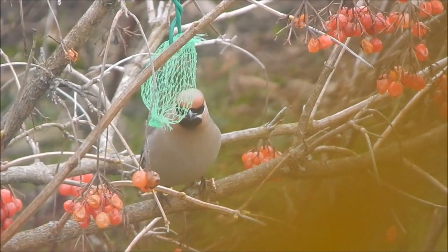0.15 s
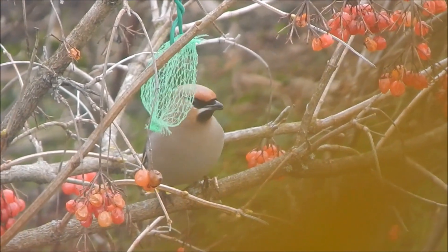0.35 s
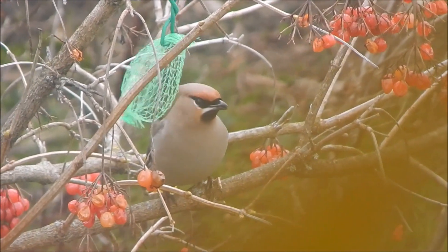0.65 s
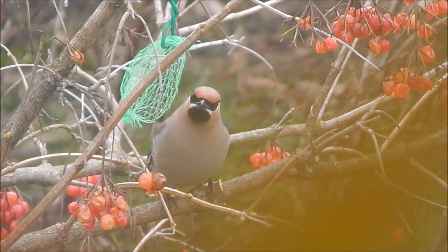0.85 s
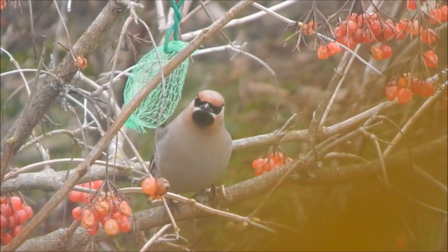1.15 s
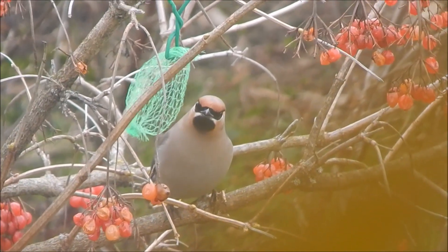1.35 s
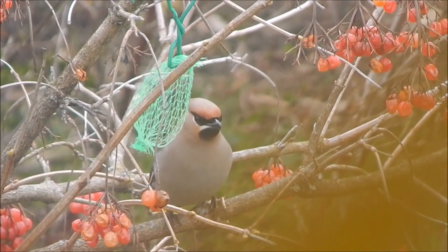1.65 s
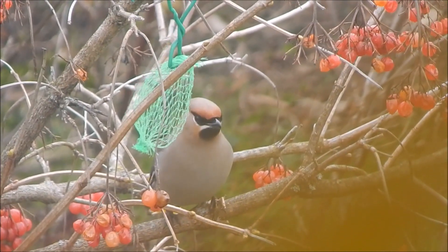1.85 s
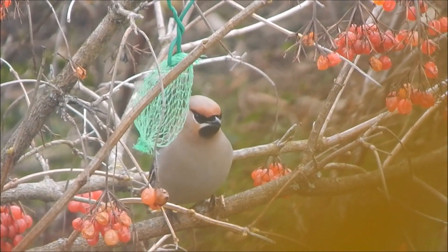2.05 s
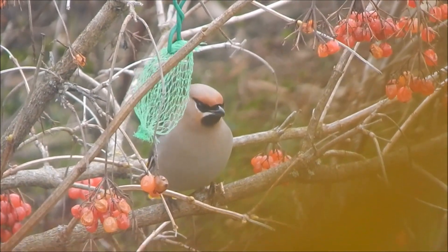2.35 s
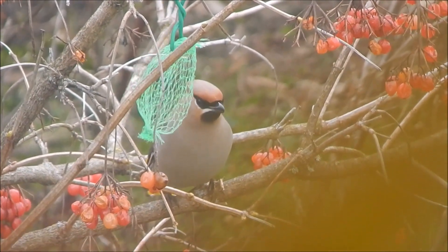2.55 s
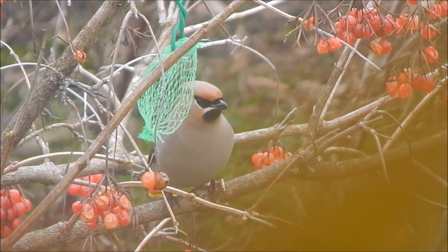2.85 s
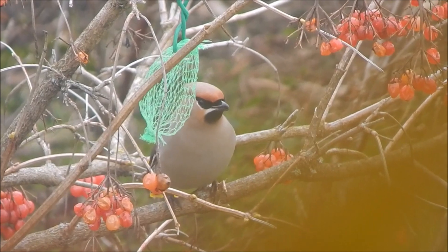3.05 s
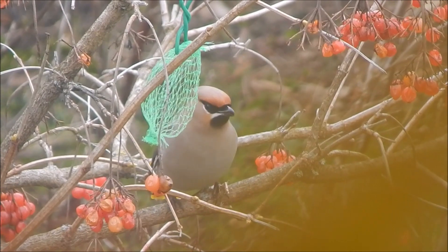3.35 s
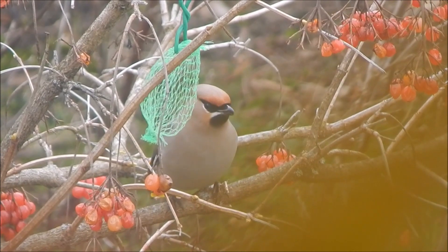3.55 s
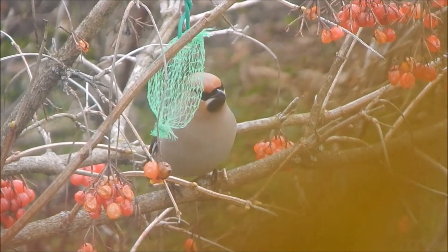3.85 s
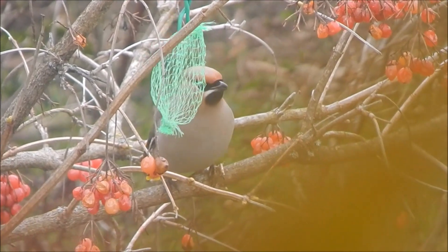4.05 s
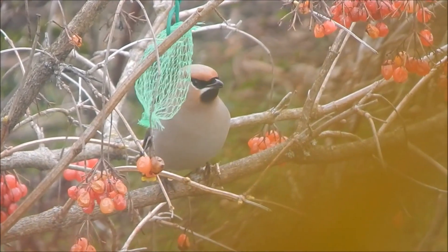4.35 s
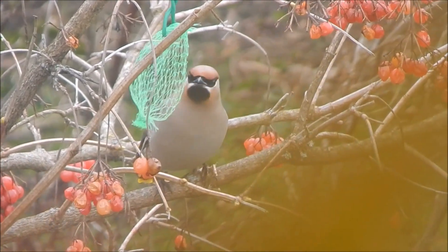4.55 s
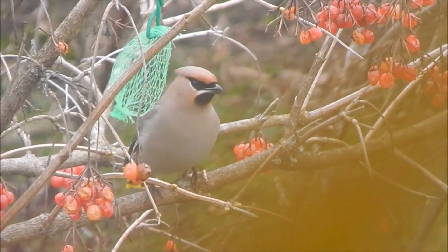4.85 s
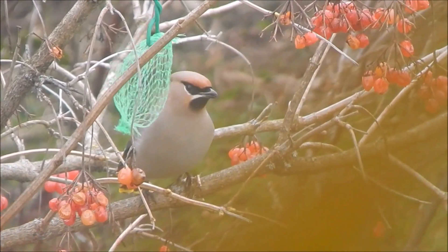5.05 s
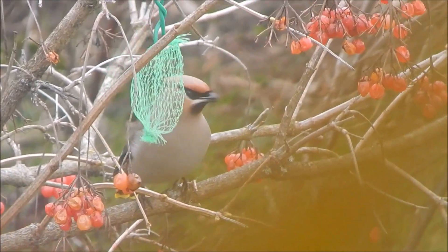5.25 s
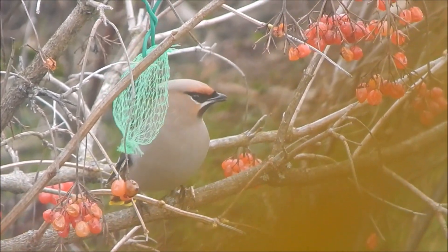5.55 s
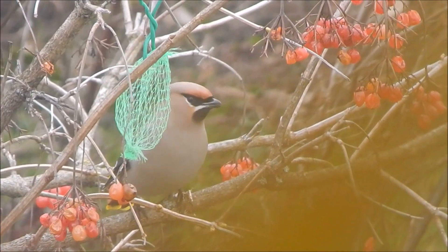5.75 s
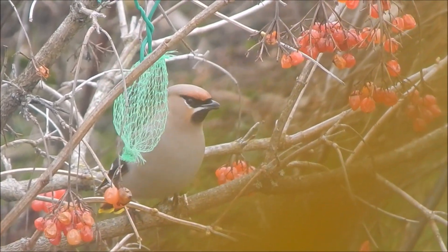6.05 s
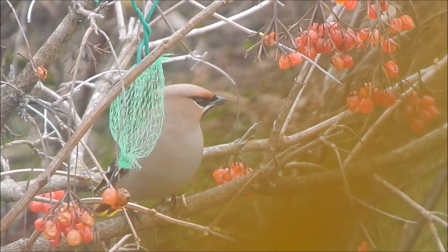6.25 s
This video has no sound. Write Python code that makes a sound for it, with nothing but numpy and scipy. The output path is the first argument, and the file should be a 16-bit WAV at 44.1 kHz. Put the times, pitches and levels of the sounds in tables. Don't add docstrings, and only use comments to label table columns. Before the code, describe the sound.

Over a low, steady hum of far traffic, faint thin whistles and twig ticks come first. Then a soft run of lower arched notes, rustling, and a small bird some metres away giving two falling slurs and a long, fast, even trill. Two short finch calls rasp upward into ringing whistles, faint distant birds answer, and the slurs and trill begin again. Outdoor garden microphone, short natural scatter from branches.

```python
import sys
import numpy as np
from scipy import signal
from scipy.fft import rfft, irfft
from scipy.io import wavfile
from scipy.ndimage import uniform_filter1d

SR = 44100
rng = np.random.default_rng(int(sys.argv[2]) if len(sys.argv) > 2 else 0)


def log_audio(samples):
    frames = np.atleast_2d(samples).T
    limited = np.clip(frames, -1, 1)
    pcm = np.round(limited * 32767).astype(np.int16)
    wavfile.write(sys.argv[1], SR, pcm)


def boost(x):
    u = np.asarray(x, float) / 20
    return 10 ** u


N = 282240

# frequency in Hz, level in dB per Hz.
TRAFFIC_COLOUR = [(28, -32.5), (50, -4), (120, -1), (290, -11.5), (500, -6.5), (734, -7), (1100, -13.5),
                  (1900, -33), (3500, -33), (5000, -29.5), (8000, -32.5), (11400, -33), (12000, -39),
                  (15800, -43)]
# time in seconds, tyre roar in dB, engine rumble in dB, breeze in leaves in dB.
ROAD_LEVELS = [(0.0, -64, -1, -0.5), (0.35, -65.5, -0.5, -1), (.6, -65.5, 0, -6), (0.8, -65, 7.5, 0.5),
               (1.15, -65.5, 0.5, 1), (1.4, -67, 1.5, -3), (1.75, -65.5, 1, -3), (2.1, -65.5, 1, 1),
               (2.8, -66, -0.5, -4), (3.4, -67.5, -5.5, 2), (4.4, -67.5, -3.5, 0.5), (5.5, -68, -3, -0.5),
               (6.4, -65, 5.5, 2)]
# delay in seconds, level in dB.
WALL_ECHOES = [(.005, -17), (.015, -15.5), (.022, -16.5), (.028, -17), (.036, -23.5)]

# start in seconds, hold in seconds, crisp level in dB, soft level in dB.
RUSTLES = [(0.073, 0.076, -92, -81), (0.44, 0.018, -86, -97), (0.642, 0.15, -91, -84.5),
           (0.756, 0.37, -79.5, -79.5), (1.134, 0.082, -71.5, -66), (1.252, 0.021, -76.5, -75.5),
           (1.328, 0.078, -84, -75.5), (1.4, 0.08, -77.5, -73), (1.51, 0.033, -67, -68),
           (1.596, 0.11, -79, -74.5), (1.685, 0.034, -71.5, -65.5), (1.76, 0.12, -75.5, -75),
           (1.923, 0.067, -70.5, -70), (2.279, 0.047, -75.5, -80), (2.39, 0.028, -83, -75.5),
           (2.484, .03, -80, -90), (2.05, 0.17, -83.5, -82.5), (2.823, .005, -76.5, -83),
           (3.005, .02, -79.5, -96), (3.274, 0.09, -84, -79.5), (4.142, 0.012, -77, -94),
           (4.297, 0.0085, -86, -85.5), (4.506, 0.013, -81.5, -88), (4.702, 0.014, -94, -81.5),
           (4.913, 0.013, -86, -84), (5.113, 0.014, -84.5, -82), (5.508, .01, -97, -83),
           (5.806, 0.506, -92, -85.5)]
# frequency in Hz, level in dB per Hz.
LEAF_COLOUR = [(2500, -30), (4200, -3.5), (7000, -8.5), (10000, -22.5), (15800, -31)]
# frequency in Hz, level in dB per Hz.
FEATHER_COLOUR = [(900, -9), (1500, -4.5), (2300, 1.5), (3700, -4), (5000, -2.5), (8000, -42)]
STIR_DB_PER_S, SETTLE_DB_PER_S = 600, 252

# time in seconds, crack level in dB, knock level in dB.
TICKS = [(3.5855, -58, -60), (0.7746, -63, -59), (0.8714, -67, -59.5), (0.8833, -65, -59),
         (0.9667, -66, -72), (1.0374, -64, -60), (1.2124, -56.5, -64), (1.386, -74, -61),
         (1.2415, -67, -68), (1.2505, -71, -70), (1.4315, -72, -66), (1.171, -67, -66), (1.196, -66, -62),
         (1.1552, -62, -67), (1.136, -75, -66), (1.219, -74, -66), (4.125, -73, -87), (4.4952, -67, -69),
         (4.518, -70, -75), (4.5561, -79, -71), (4.3294, -80, -72), (4.366, -76, -70), (1.9726, -62, -74),
         (1.503, -64, -72), (1.5105, -58, -65), (1.6884, -76, -67), (1.7278, -76, -56), (1.9275, -53, -58),
         (1.9455, -59, -54.5), (1.9687, -62, -76), (1.991, -54, -74), (2.0162, -73, -56), (2.288, -61, -74),
         (2.4758, -61.5, -71), (2.5148, -77, -65), (2.8197, -57.5, -85), (3.3748, -82, -54.5),
         (3.92, -71, -70), (3.9504, -57.5, -88), (4.0422, -64, -68), (4.151, -66, -72), (4.3, -65, -81),
         (4.5044, -66.5, -81), (5.243, -89, -63), (5.5244, -88.5, -64)]
FAINT_TICK_TIMES = [0.443, 0.62, 0.69, 1.1093, 1.161, 1.3, 1.18, 1.196, 1.304, 2.1, 4.313, 1.4, 1.1, 1.3,
                    1.3, 2.602, 2.916, 3.7683, 6, 4.9301, 6.4, 6]
FAINT_CRACK_DB, FAINT_KNOCK_DB = -70.5, -76.5
# start in seconds, length in seconds, pitch of the hollow in Hz, level in dB.
SCRAPES = [(1.14, 0.046, 1640, -63), (1.135, .045, 2300, -67), (1.154, 0.048, 3600, -57.5),
           (1.138, .05, 4330, -69), (1.201, .02, 2020, -68), (1.241, 0.029, 3780, -65.5),
           (1.308, .042, 3750, -68), (1.481, 0.034, 3950, -64), (1.54, .035, 3600, -62.5),
           (1.612, 0.032, 3450, -64), (1.773, .03, 3430, -65), (2.284, 0.03, 2600, -71),
           (2.48, 0.031, 3250, -70.5), (2.142, 0.076, 4200, -70.5), (4.321, 0.013, 4000, -70),
           (4.361, 0.013, 3700, -71.5)]
SLIPS_PER_S, HOLLOW_WIDTH, SLIP_SCATTER_DB = 1100, .26, 2.5

# start in seconds, length in seconds, lowest pitch in Hz, level in dB.
FAR_CALLS = [(3.238, 0.12, 5030, -61), (3.421, 0.13, 4860, -64.5), (3.618, 0.1, 5050, -60),
             (4.143, 0.14, 5057, -63.5), (4.357, 0.091, 5070, -65.5), (4.573, 0.09, 4920, -65.5),
             (4.559, 0.055, 3840, -69), (4.698, 0.036, 3760, -66.5), (4.78, 0.26, 4130, -82.5),
             (4.998, 0.052, 2156, -75.5), (0.6, 0.078, 6400, -69), (0.79, 0.1, 6160, -72),
             (2.273, 0.13, 6300, -73.5), (2.699, 0.22, 6490, -74.5), (4.848, 0.13, 6030, -79.5)]
# share of length, share of pitch range, level in dB, share of lead-in.
FAR_SHAPE = [(0, 0.93, -3.5, 0.7), (.2, 0.93, -2, 0.64), (.5, .55, -5, 0.19), (.85, 0.059, -6.5, 0.1),
             (1, 0.12, -16, 0)]
FAR_FALL, FAR_LEAD_DB = 1.12, -2
# start in seconds, length in seconds, pitch in Hz, level in dB.
MURMURS = [(0.067, 0.059, 2470, -79), (.12, 0.27, 2864, -78.5), (.3, .24, 2620, -85),
           (2.521, 0.14, 2470, -79), (2.542, .1, 2690, -80), (2.723, .17, 2690, -76.5),
           (2.757, .07, 2460, -76), (2.88, 0.071, 2550, -84), (3.442, .09, 2360, -76.5),
           (4.66, 0.14, 2226, -80), (5.2, 0.088, 2420, -81), (5.4, .2, 2260, -82), (5.585, .02, 5330, -78)]

# start in seconds, length in seconds, first Hz, last Hz, level in dB.
WHISTLES = [(0.567, .022, 7240, 7170, -70.5), (.586, .024, 7360, 6200, -70), (.725, 0.027, 7150, 7200, -75),
            (0.744, 0.022, 7100, 6400, -67), (0.884, 0.023, 7130, 6300, -66),
            (2.556, 0.085, 4100, 3980, -75), (5.966, .014, 4170, 4550, -65.5),
            (3.297, 0.052, 4350, 4200, -68), (2.874, 0.015, 7030, 6250, -70), (3, 0.042, 7400, 6360, -73),
            (3.03, 0.15, 7760, 7540, -74.5), (3.384, 0.13, 4450, 4080, -71), (3.881, 0.22, 7470, 7640, -77),
            (4.114, 0.024, 7220, 6240, -72), (.55, 0.455, 518.5, 551.3, -67.5),
            (5.455, 0.049, 3240, 3155, -76)]
SCOOP, SCOOP_SHARE, SCOOP_DB = 0.025, 0.13, -3
FADE_SHARE, FADE_DB = 0.05, -19
# time in seconds, pitch in Hz, level in dB.
GLIDE = [(5.2, 4420, -80), (5.215, 4550, -74.5), (5.27, 4480, -72), (5.31, 4270, -71), (5.352, 4140, -74),
         (5.37, 4080, -73), (5.425, 3960, -73), (5.44, 3550, -84), (5.456, 3250, -85)]
# start in seconds, length in seconds, top pitch in Hz, last pitch in Hz, level in dB.
BOWS = [
    (0.761, 0.21, 3685, 3530, -69.5),
    (0.964, 0.14, 7130, 6880, -64.5),
    (2.213, 0.137, 3170, 3100, -75),
    (2.371, 0.19, 4010, 3820, -65),
]
# share of length, share of pitch, level in dB.
BOW_SHAPE = [(0, .94, -12), (.1, .972, -3), (.28, 1, 3), (.55, 1, 2), (.85, 1, -4), (1, 1, -11)]

# start in seconds, highest pitch in Hz, level in dB.
ARCHES = [(1.304, 2940, -67), (1.394, 2910, -63), (1.484, 2870, -63), (1.571, 2810, -63),
          (1.667, 2860, -63), (1.765, 2890, -58.5), (6.161, 2900, -66.5)]
# share of length, share of pitch range, level in dB, share of lead-in.
ARCH_SHAPE = [(0, 0, -4, 0), (.2, .4, -2, 0), (.38, .82, -1, 0), (.58, 1, 0, 0), (.75, .88, 0, 0),
              (.9, .58, -1, 0), (1.02, .45, -6, 0)]
# start in seconds, highest pitch in Hz, level in dB.
LATE_ARCHES = [(5.803, 2990, -69), (5.885, 3020, -64.5), (5.972, 3040, -64), (6.060, 2970, -62.5),
               (1.858, 2950, -59.5), (6.261, 2930, -70)]
# share of length, share of pitch range, level in dB, share of lead-in.
LATE_ARCH_SHAPE = [(0, 0.12, -3, 0), (.2, 0.557, -7.5, 0), (.38, 0.82, -4, 0), (.6, 0.94, 1, 0),
                   (.9, .95, -6, 0), (1.05, .8, -10, 0), (1.2, 0.44, -14, 0)]
ARCH_S, ARCH_LOW_HZ = 0.0552, 2140

# time in seconds, strongest band in Hz, level in dB, upper bands in dB.
CHIRP = [(.044, 3680, -79, 4), (.062, 4040, -65.5, -1), (.088, 4210, -62.5, -10), (.117, 4370, -64, -6),
         (.132, 4120, -69, -2), (.15, 4060, -75, -3)]
CHIRP_STEP_HZ = 370

# time in seconds, pitch in Hz, level in dB.
FINCH_CALLS = [
    [(3.537, 2230, -63), (3.563, 2525, -58), (3.575, 3010, -51), (3.587, 3740, -38.5), (3.596, 4200, -34.5),
     (3.606, 4310, -37), (3.632, 4228, -36.5), (3.652, 4340, -43), (3.66, 4290, -104)],
    [(3.791, 2396, -62), (3.822, 2422, -60), (3.835, 2875, -54), (3.847, 3580, -41), (3.857, 4200, -36),
     (3.864, 4247, -34.5), (3.888, 4237, -32), (3.897, 4220, -35.5), (3.905, 4370, -68.5)],
]
# multiple of pitch, level in dB.
RASP = [(1.5, -8), (2, 0), (2.5, -1), (3, -11), (3.5, -11), (4, -27)]
# pitch in Hz, level in dB.
RASP_FADE = [(2200, 2.5), (2500, 10.5), (2950, -1.5), (3600, -36), (4200, -74.5)]
RASP_LAG_S, RASP_LAG_DB = .009, -24
# multiple of pitch, level in dB.
RING = [(2, -36), (3, -34)]
RING_DB, RING_FADE_DB_PER_S = (-5, -8), 90

# start in seconds, highest pitch in Hz, lowest pitch in Hz, level in dB, lead-in in dB.
SLURS = [
    (1.516, 6890, 5630, -40, -9),
    (1.629, 6790, 5550, -38, -8),
    (5.753, 6960, 5660, -41, -18.5),
    (5.866, 6810, 5600, -40.5, -6.5),
]
# share of length, share of pitch range, level in dB, share of lead-in.
SLUR_SHAPE = [(0.031, -0.91, -10, 1), (.155, 0.296, -3, 1), (.24, 0.914, 1.5, 0.42), (.31, 1, -2, 0.37),
              (0.421, .86, 0, 0.15), (0.701, 0.25, -1, 0), (.9, 0.02, 0, 0), (.95, -0.04, -17, 0),
              (1, -1.2, -15, 0)]
# share of length, share of pitch range, level in dB, share of lead-in.
FLICK_SHAPE = [(-.05, -1.3, -24, 0), (.03, -0.21, -25, 0), (.1, .6, -19, 0), (.16, 1.0, -21, 0),
               (.24, 1.15, -24, 0)]
SLUR_S = 0.06

# start in seconds, lowest pitch in Hz, level in dB, lead-in in dB.
TRILL = [(1.735, 4360, -35, -11), (1.834, 4446, -34, -10), (1.928, 4430, -34, -15), (2.034, 4405, -36, -1),
         (2.134, 4430, -36.5, -5), (2.241, 4390, -36.5, -9), (2.35, 4380, -37.5, 2),
         (2.455, 4346, -36.5, -4.5), (2.566, 4380, -38, -5), (2.678, 4260, -37, -10),
         (2.792, 4287, -35.5, -6.5), (2.911, 4274, -37, -9), (3.023, 4242, -37, -4), (5.973, 4350, -39, -9),
         (6.07, 4380, -36.5, -5.5), (6.168, 4340, -40, -11), (6.264, 4330, -37.5, -6),
         (6.371, 4450, -33.5, -9)]
# share of length, share of pitch range, level in dB, share of lead-in.
TRILL_SHAPE = [(0, .65, -22, 1), (.1, .42, -4, 1), (.23, 0, -3, .6), (.32, .07, -12, .25),
               (.42, .27, -2, 0), (.6, .67, -1, 0), (.77, .93, -1, 0), (.91, 1, -3, 0), (1, .9, -24, 0)]
# share of length where it catches, swell to the end in dB, lift of the top in Hz.
VOICING = [(0.4, 4, 30), (.32, 3.5, 4), (0.22, 6.5, 10), (.3, 3, 12), (0.346, 4, 0.1), (0.24, 1.5, 0.1),
           (0.26, 3.5, 0.1), (0.29, 3, 0.1), (0.29, 0, 0.1), (.43, -6, 25), (0.51, -4.5, 25.4),
           (0.42, -5, 33), (.46, -2, 0.1), (0.45, -4, 64), (0.49, 0, 30), (0.49, -5, 27), (0.6, -1, 20),
           (0.71, -4, -120)]
TRILL_STARTS_S = 1.73, 5.96
TRILL_NOTE_S, TRILL_TOP_HZ = 0.0676, 4716
TIRING_S_PER_S, SAG_HZ_PER_S = 0.0044, 56


def colour(x, points):
    hz, db = np.transpose(points)
    f = np.maximum(np.fft.rfftfreq(len(x), 1 / SR), 1)
    gain_db = np.interp(np.log(f), np.log(hz), db, left=-90, right=-90)
    return irfft(rfft(x) * boost(gain_db), len(x))


def unit(x):
    return x / np.sqrt(np.mean(x ** 2))


def walk(rate, count=N):
    k = int(SR / rate)
    held = np.repeat(rng.standard_normal(count // k + 1), k)
    return 1.73 * uniform_filter1d(uniform_filter1d(held, k), k)[:count]


def band(hz, kind, order=2):
    return signal.butter(order, hz, kind, fs=SR, output="sos")


def curves(rows):
    s, *columns = np.transpose(rows)
    i = np.arange(int(s[0] * SR), min(int(s[-1] * SR), N))
    return i, [uniform_filter1d(np.interp(i / SR, s, c), size=120, mode="nearest") for c in columns]


def add(out, i, hz, db, partials, wobble=0.0043, flicker_db=3.0, haste=150):
    unsteady_hz = hz * (1 + wobble * walk(haste, count=len(i)))
    phase = 2 * np.pi * np.cumsum(unsteady_hz) / SR
    fade = signal.windows.tukey(len(i), min(1, 300 / len(i)))
    gain = np.sqrt(2) * boost(db + flicker_db * walk(0.586 * haste, count=len(i))) * fade
    for multiple, partial_db in partials:
        audible = multiple * hz < .4 * SR
        out[i] += gain * boost(partial_db) * audible * np.sin(multiple * phase)


def phrase(notes, shape, **unsteady):
    out = np.zeros(N)
    at, rise, shape_db, lead = np.transpose(shape)
    for s, length, low, top, db, lead_db in notes:
        note = [s + length * at, low + (top - low) * rise, db + shape_db + lead_db * lead]
        i, (hz, note_db) = curves(np.transpose(note))
        add(out, i, hz, note_db, [(1, -1.5), (2, -48.5)], **unsteady)
    return out


def garden(t60, direct_db, wet_db, late_db=-18):
    t = np.arange(SR) / SR
    decay = boost(-60 * t / t60) + boost(late_db - 60 * t / (3.2 * t60))
    scatter = rng.standard_normal(SR) * decay * np.minimum(t / .004, 1)
    scatter = scatter * boost(2.2 * walk(130, count=SR))
    response = boost(wet_db) * scatter / np.sqrt(np.sum(scatter ** 2))
    response[0] = boost(direct_db)
    for delay, db in WALL_ECHOES:
        response[int(delay * SR)] += boost(db + direct_db)
    return response


def traffic():
    s, roar_db, rumble_db, breeze_db = np.transpose(ROAD_LEVELS)
    mean_db = np.mean(roar_db)
    t = np.arange(N) / SR
    roar = np.interp(t, s, roar_db)
    rumble = np.interp(t, s, mean_db + rumble_db)
    breeze = np.interp(t, s, mean_db + breeze_db)
    bands = [(95, "low"), ([95, 200], "band"), ([200, 1500], "band"), ([1500, 4100], "band"), (4100, "high")]
    deep, low, mid, leaves, high = (
        signal.sosfilt(band(hz, kind), colour(rng.standard_normal(N), TRAFFIC_COLOUR)) for hz, kind in bands)
    mix = deep * boost(mean_db - 1.0)
    mix += low * boost(rumble + 1.0 * walk(9.3))
    mix += mid * boost(roar + 1.0 * walk(9))
    mix += leaves * boost(breeze + 1.2 * walk(5.91))
    mix += high * boost(mean_db + .4 * walk(3))
    return mix * boost(1.5) / np.std(mid)


def rustle():
    level_db = np.full((2, N), -120.)
    t = np.arange(N) / SR
    for s, hold, *peak_db in RUSTLES:
        below = STIR_DB_PER_S * np.maximum(s - t, 0) + SETTLE_DB_PER_S * np.maximum(t - s - hold, 0)
        level_db = np.maximum(level_db, np.array(peak_db)[:, None] - below)
    out = 0
    for db, spectrum, lift_db in zip(level_db, (LEAF_COLOUR, FEATHER_COLOUR), (7, 5)):
        size = boost(2.0 * np.minimum(rng.exponential(size=N), 4))
        specks = (rng.random(N) < 2500 / SR) * rng.standard_normal(N) * size
        grain = colour(unit(specks) + .9 * rng.standard_normal(N), spectrum)
        stir = np.sqrt(np.maximum(boost(db) ** 2 - boost(-93.5) ** 2, 0))
        out = out + unit(grain) * stir * boost(lift_db + 2.27 * walk(60))
    return out


def ticks():
    out, t = np.zeros(N + 600), np.arange(600) / SR
    bright, dull = band([4200, 8500], "band", 3), band([1580, 4840], "band", 3)
    rows = TICKS + [(s, FAINT_CRACK_DB, FAINT_KNOCK_DB) for s in FAINT_TICK_TIMES]
    for (s, crack_db, knock_db), noise in zip(rows, rng.standard_normal((len(rows), 2, 600))):
        crack = boost(crack_db + 13.5) * signal.sosfilt(bright, noise[0] * np.exp(-t / 0.0009))
        knock = boost(knock_db + 12.0) * signal.sosfilt(dull, noise[1] * np.exp(-t / 0.0018))
        out[int(s * SR):int(s * SR) + 600] += crack + knock
    return out[:N]


def scrapes():
    out = np.zeros(N)
    for (s, length, hz, db), chance in zip(SCRAPES, rng.random((len(SCRAPES), 3, 4000))):
        size = int(length * SR)
        strength = boost(-SLIP_SCATTER_DB * np.log(chance[2] + 1e-3))
        slips = (chance[0] < SLIPS_PER_S / SR) * (chance[1] - .5) * strength
        hollow = band([hz * (1 - HOLLOW_WIDTH / 2), hz * (1 + HOLLOW_WIDTH / 2)], "band")
        sound = signal.sosfilt(hollow, slips + .02 * (chance[1] - .5))[:size]
        out[int(s * SR):int(s * SR) + size] += unit(sound) * boost(db) * signal.windows.tukey(size, .6)
    return out


def far_birds():
    calls = [(s, length, low, low * FAR_FALL, db, FAR_LEAD_DB) for s, length, low, db in FAR_CALLS]
    murmurs = [(s, length, hz, hz, db, 0) for s, length, hz, db in MURMURS]
    calling = phrase(calls, FAR_SHAPE, wobble=0.03, flicker_db=3, haste=800) * boost(2)
    return calling + phrase(murmurs, FAR_SHAPE, wobble=.02, flicker_db=3, haste=400)


def whistles():
    out = np.zeros(N)
    for s, length, first, last, db in WHISTLES:
        i, (hz, level_db) = curves([
            (s, first * (1 - SCOOP), db + SCOOP_DB),
            (s + length * SCOOP_SHARE, first, db),
            (s + length * (1 - FADE_SHARE), last + (first - last) * FADE_SHARE, db),
            (s + length, last, db + FADE_DB)])
        add(out, i, hz, level_db, [(1, 0)], wobble=0.0046, flicker_db=3, haste=220)
    i, (hz, level_db) = curves(GLIDE)
    add(out, i, hz, level_db, [(1, 0)], wobble=.004, flicker_db=2, haste=220)
    return out


def bows():
    out = np.zeros(N)
    at, share, shape_db = np.transpose(BOW_SHAPE)
    for s, length, top, last, db in BOWS:
        pitch = share * np.interp(at, [.28, 1], [top, last])
        i, (hz, level_db) = curves(np.transpose([s + length * at, pitch, db + shape_db]))
        add(out, i, hz, level_db, [(1, 0)], wobble=24 / top, flicker_db=2.5, haste=160)
    return out


def arches(rows, shape):
    notes = [(s, ARCH_S, ARCH_LOW_HZ, top, db, 0) for s, top, db in rows]
    return phrase(notes, shape, flicker_db=0.5)


def chirp():
    out = np.zeros(N)
    i, (hz, db, upper_db) = curves(CHIRP)
    for number, band_db in enumerate((-1, upper_db - 1, upper_db - 4)):
        add(out, i, hz + number * CHIRP_STEP_HZ, db + band_db, [(1, 0)], wobble=.004, flicker_db=2.5)
    return out


def finch():
    voice, ring = np.zeros(N), np.zeros(N)
    for call, ring_db in zip(FINCH_CALLS, RING_DB):
        i, (hz, db) = curves(call)
        since = (i - i[0]) / SR
        rasp_db = np.interp(np.maximum.accumulate(hz), *np.transpose(RASP_FADE))
        rasp_db = rasp_db + RASP_LAG_DB * np.exp(-since / RASP_LAG_S)
        climb = np.clip(np.gradient(hz) * SR / 5e4, 0, 1)
        beat = 2 * np.pi * 140 * i / SR
        hz = hz * (1 + .035 * climb * np.sin(beat))
        db = db + 3 * climb - 7 * climb * (1 + np.cos(beat)) / 2
        partials = [(1, 0.021)] + [(m, d + rasp_db) for m, d in RASP]
        add(voice, i, hz, db, partials, wobble=0.0011 + 0.022 * climb, flicker_db=1.5, haste=330)
        held_db = db - 14 * climb + ring_db - RING_FADE_DB_PER_S * since + 5
        add(ring, i, hz, held_db, RING, wobble=0.0024)
    throat = [(1000, 0), (6500, 0), (8000, -5), (9500, -20), (12000, -35), (22000, -40)]  # (Hz, dB)
    return colour(voice, throat) + ring


def slurs():
    notes = [(s, SLUR_S, low, top, db, lead_db) for s, top, low, db, lead_db in SLURS]
    falling = phrase(notes, SLUR_SHAPE, wobble=.003, flicker_db=.8)
    return falling + phrase(notes, FLICK_SHAPE, flicker_db=1.5)


def trill():
    out = np.zeros(N)
    at, rise, shape_db, lead = np.transpose(TRILL_SHAPE)
    for (s, low, db, lead_db), (catch, swell_db, lift_hz) in zip(TRILL, VOICING):
        sung = s - max(start for start in TRILL_STARTS_S if start < s)
        length = TRILL_NOTE_S - TIRING_S_PER_S * sung
        top = TRILL_TOP_HZ - SAG_HZ_PER_S * sung + lift_hz
        moved = np.interp(at, [0, .32, 1], [0, catch, 1])
        voiced_db = shape_db + swell_db * (2 * moved - 1.4)
        shape = np.transpose([moved, np.interp(moved, at, rise), voiced_db, lead])
        out += phrase([(s, length, low, top, db, lead_db)], shape, wobble=.0015, flicker_db=.8)
    return out


def scene():
    distant, thicket, hedge = garden(.45, -10, -1.5), garden(.3, -4, -3.5), garden(.3, -2, -6)
    twigs, treetop = garden(.15, -.5, -13), garden(0.47, -0.74, -11.5)
    beside, close = garden(.4, -.5, -9, late_db=-26), garden(.36, -1, -10.5, late_db=-22)
    layers = [
        (ticks(), twigs), (scrapes(), twigs),
        (far_birds(), distant), (whistles(), hedge), (bows(), close),
        (arches(ARCHES, ARCH_SHAPE), treetop), (arches(LATE_ARCHES, LATE_ARCH_SHAPE), thicket),
        (chirp(), twigs), (finch(), beside), (slurs(), treetop), (trill(), close)]
    birds = sum(signal.fftconvolve(x, response)[:N] for x, response in layers)
    return (traffic() + rustle() + birds)[None]


def top_cut(x):
    return signal.sosfilt(signal.butter(12, 15720, fs=SR, output="sos"), x)


def record(dry):
    return top_cut(dry)


dry = scene()
out = record(dry)
log_audio(out)
```